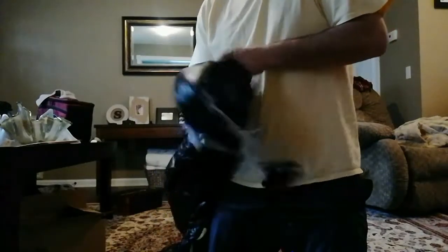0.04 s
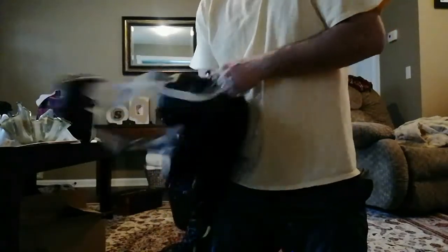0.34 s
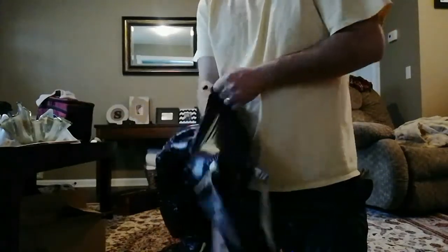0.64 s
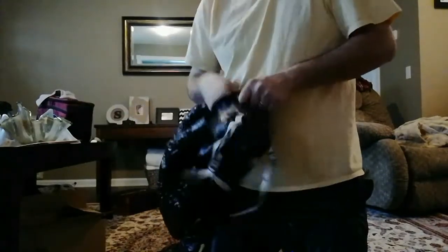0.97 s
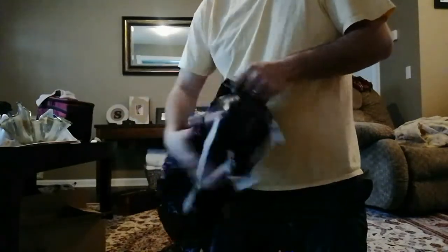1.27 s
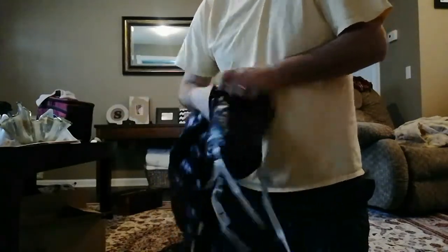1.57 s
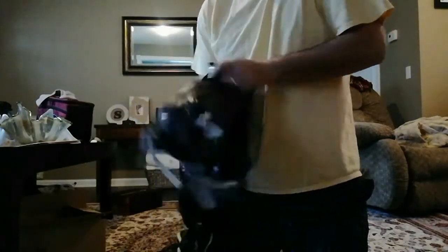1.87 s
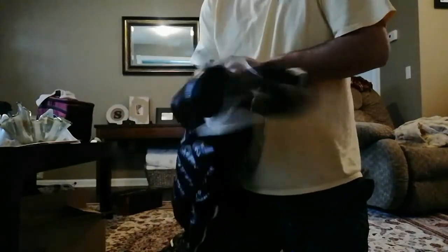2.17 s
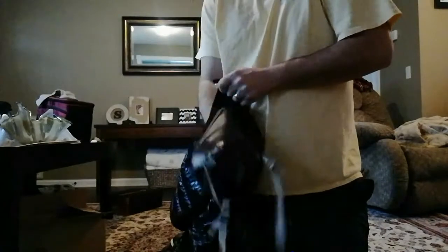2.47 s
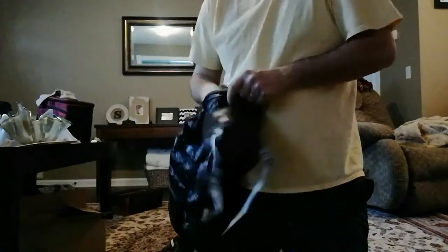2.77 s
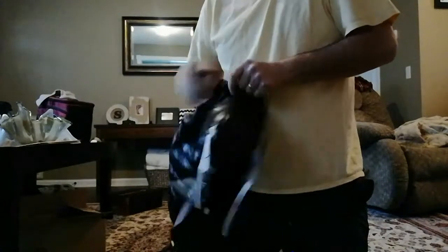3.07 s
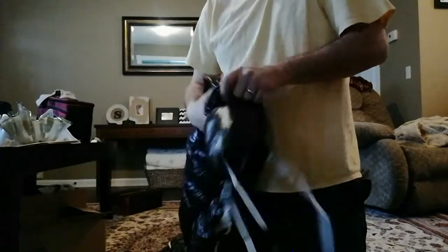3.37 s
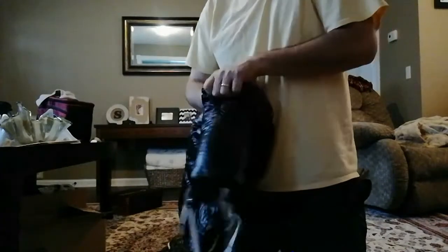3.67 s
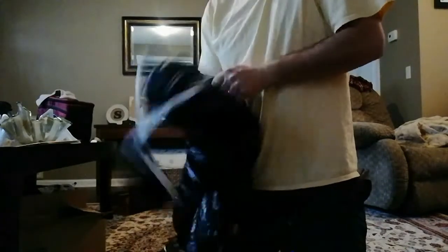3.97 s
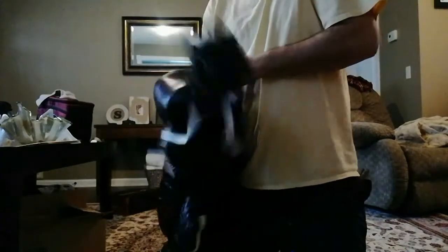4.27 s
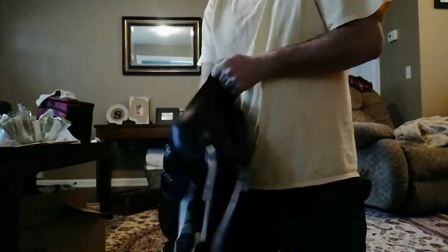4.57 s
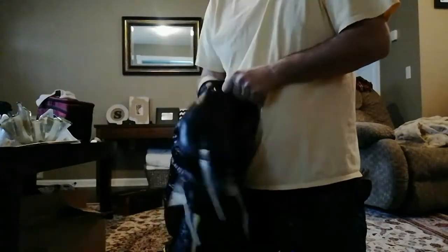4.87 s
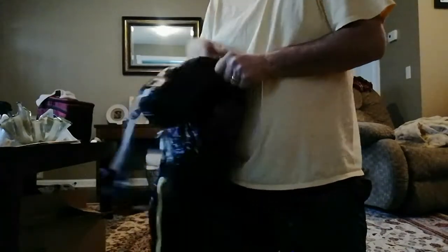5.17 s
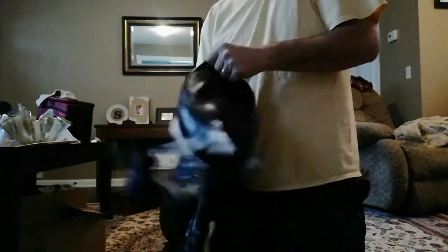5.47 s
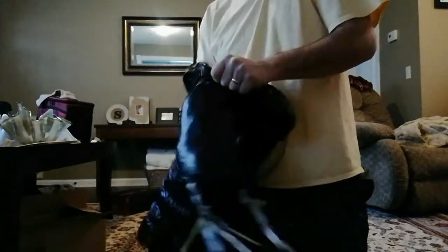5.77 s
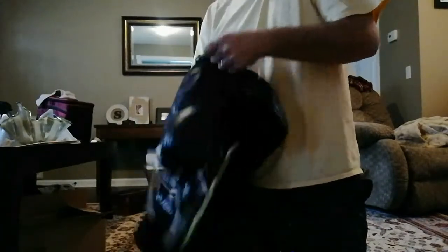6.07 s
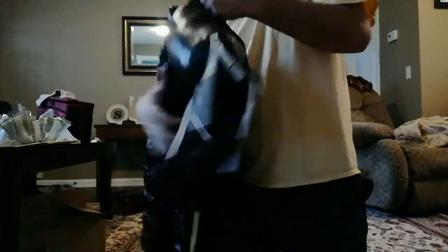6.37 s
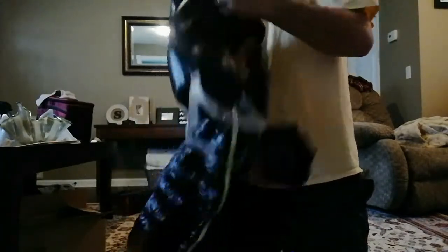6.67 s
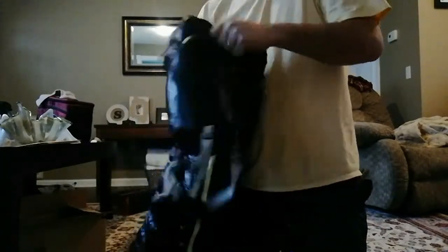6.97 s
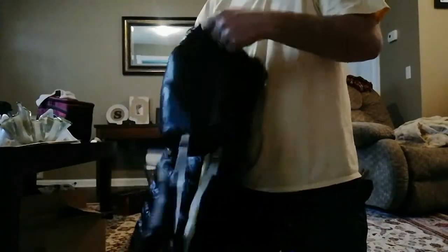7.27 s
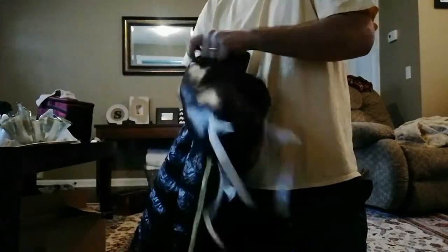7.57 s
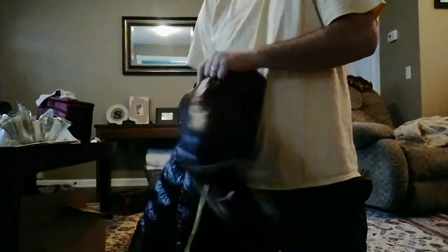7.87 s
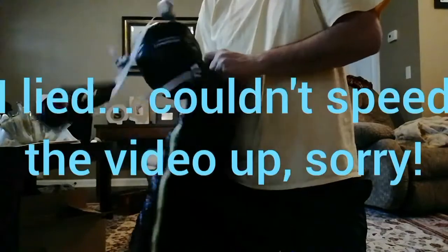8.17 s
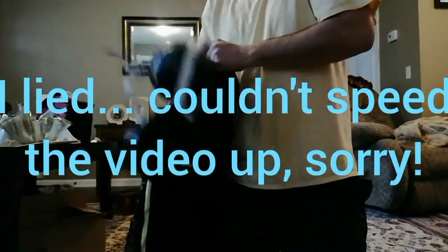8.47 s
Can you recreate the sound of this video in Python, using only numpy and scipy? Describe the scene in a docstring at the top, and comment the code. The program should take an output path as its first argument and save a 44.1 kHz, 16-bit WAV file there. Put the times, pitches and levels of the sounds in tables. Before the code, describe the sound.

Slippery nylon swishes and rustles in repeated, irregular shoves as someone stuffs a sleeping bag into a sack. Folds crumple, a hand scuffs the fabric, and the cloth snaps or flaps at intervals. After a vigorous start and a softer stretch in the second half, it ends with a flurry of snaps and louder rustling. The sound is close and fairly dry, in a quiet living room.

```python
"""Stuffing a sleeping bag

A nylon sleeping bag is crammed by hand into its stuff sack in a furnished living room, with a small
stereo recorder close by. Cloth slides on cloth with a swish, folds crumple, the filling billows,
the hand scuffs the nylon, the weave zips, and the sack snaps whenever it is jerked taut."""
import sys
import numpy as np
from scipy import signal
from scipy.fft import rfft, irfft, next_fast_len
from scipy.io import wavfile

SR = 44100
rng = np.random.default_rng(int(sys.argv[2]) if len(sys.argv) > 2 else 0)


def generate_wav(sig):
    """Save sig (samples, or channels by samples) to the path in sys.argv[1] as 16-bit PCM at SR."""
    pcm = np.round(np.clip(np.atleast_2d(sig).T, -1, 1) * 32767).astype(np.int16)
    wavfile.write(sys.argv[1], SR, pcm)


N = 375732


def from_db(db):
    return 10 ** (np.asarray(db) / 20)


def rms_one(x):
    return x / np.sqrt(np.mean(x ** 2) + 1e-20)


def at_hz(points, hz):
    """The columns of a table, read on a log-frequency axis."""
    known, *columns = np.transpose(points)
    return np.squeeze([np.interp(np.log(hz + 1e-9), np.log(known), c) for c in columns])


def butter(x, hz, kind, order=2):
    return signal.sosfilt(signal.butter(order, np.clip(hz, 10, .45 * SR), kind, fs=SR, output="sos"), x)


def split(x, hz):
    """The parts below and above a pitch; they add up to the whole."""
    low = signal.sosfiltfilt(signal.butter(3, hz, fs=SR, output="sos"), x)
    return low, x - low


def resonate(x, modes):
    """Each mode lifts or hollows a band of its own."""
    for hz, width_hz, gain_db in modes:
        x = x + (from_db(gain_db) - 1) * signal.lfilter(*signal.iirpeak(hz, hz / width_hz, fs=SR), x)
    return x


def drift(rate_hz):
    """A slow random wander of rms 1."""
    pole = np.exp(-80 * np.pi * rate_hz / SR)
    noise = rng.standard_normal(N // 40 + 2002)
    slow = signal.lfilter([1], [1, -2 * pole, pole * pole], noise)[2000:]
    return np.interp(np.arange(N) / 40, np.arange(len(slow)), rms_one(slow))


def add(track, start_s, sound):
    at = int(np.clip(round(start_s * SR), 0, N - 1))
    track[..., at:at + sound.shape[-1]] += sound[..., :N - at]


# How alike the two microphones hear the room: pitch_hz, correlation
MIC_LIKENESS = [(40, 0.91), (150, 0.89), (280, 0.79), (500, 0), (1000, 0.26), (1500, 0.92), (2200, 0.18),
                (4000, 0.09), (8000, 0), (15000, 0)]

def stereo(pair, hz):
    """Two unrelated signals become left and right, as alike as the microphones are at this pitch."""
    alike = np.clip(at_hz(MIC_LIKENESS, hz), -.995, .995)
    mid, side = np.sqrt(1 + alike) * pair[0], np.sqrt(1 - alike) * pair[1]
    return np.array([mid + side, mid - side]) / np.sqrt(2)


def coloured(pair, spectrum):
    """White excitation takes on a spectrum that falls away beyond its ends; stereo, rms 1."""
    size = next_fast_len(N)
    hz = np.fft.rfftfreq(size, 1 / SR) + 1e-3
    ends = 1 / np.sqrt((1 + (.8 * spectrum[0][0] / hz) ** 8) * (1 + (.8 * hz / spectrum[-1][0]) ** 8))
    shaped = stereo(rfft(pair, size), hz) * ends * from_db(at_hz(spectrum, hz))
    return rms_one(irfft(shaped)[:, :N])


# The living room with nothing moving: pitch_hz, level_db
QUIET_SPECTRUM = [(20, -1.5), (45, 8), (60, 2.5), (90, -0.5), (170, -6), (300, -16), (600, -29),
                  (1200, -15.5), (2500, -49), (5000, -45), (10000, -21), (16000, -25)]

def room_tone(level_db=-72.5):
    """The quiet of the house: a faint, steady rumble."""
    return from_db(level_db) * coloured(rng.standard_normal((2, N)), QUIET_SPECTRUM)


# Each shove, tug or regrip, close to the microphones: peak_s, rise_s, fall_s, swish_db,
# taut_db (upper over lower swish), sheen_db (top treble over swish), crumple_db,
# depth_db (low rub over crumple), pan_db (left over right)
HAND_STROKES = [(0.071, 0.13, 0.15, -40.5, 1.5, 1, -41.5, -8, -1.5),
                (0.204, 0.17, 0.22, -49.5, -5, -1.5, -51.5, 3, -5),
                (0.335, 0.1, 0.18, -36.5, 7, 1.5, -37, -5, -2),
                (0.488, 0.45, 0.2, -46, -2.5, -8, -45, -25, -0.5),
                (0.823, 0.33, 0.35, -54, 7.5, 9, -61.5, 1.5, -2.5),
                (0.919, 0.06, 0.6, -60, 2, -3, -64.0, 1, 3),
                (1.327, 0.12, 0.55, -54.0, 0, -2, -59, -2, 0.5),
                (1.514, 0.15, 1, -53, -2, -2, -56.0, -1.5, -2),
                (1.664, 0.14, 0.27, -44.5, -1, -0.5, -48.0, -7, 0.5),
                (1.926, 0.15, 0.15, -37.5, 2.5, 0, -43.5, -4.0, -0.5),
                (2.053, 0.12, 0.71, -43.5, 3, -7, -47.5, -2, 1),
                (2.224, 0.34, 0.17, -36.5, -2.5, 3, -39, -9.5, -0.5),
                (2.331, 0.41, 0.2, -40, -1.5, -1, -42.5, -36, -0.5),
                (2.667, 0.19, 0.1, -46, 1, 1.5, -54.0, -8, -4.5),
                (2.812, 0.082, 0.2, -48.0, -2, 3, -48.5, -14, -4),
                (2.953, 0.21, 0.34, -57, 6.5, 2.5, -66, 8, -1.5),
                (3.236, 0.11, 0.42, -54, -2, -2, -58, 0, 3.5),
                (3.409, 0.082, 0.5, -55, -4, -2.5, -61, 7, 0.5),
                (3.559, 0.048, 0.33, -51, -3, -2, -44.5, -9.5, 1.5),
                (3.78, 0.11, 0.41, -49.5, 0.5, -6, -56, 3.5, 2),
                (3.942, 0.12, 0.24, -41, 3, 2, -50, -4.5, 0.5),
                (4.177, 0.25, 0.26, -45, 4, 2, -46.5, -5, -1),
                (4.311, 0.16, 0.15, -37.5, -7.5, -0.5, -49, -1.5, -0.5),
                (4.427, 0.22, 0.17, -40, -3.0, -1.5, -44, -13, -1.0),
                (4.665, 0.2, 0.5, -52.5, 3.5, 0, -63, -2, -4),
                (5.034, 0.38, 0.47, -61.5, 0.5, 5.5, -63, -4.5, 3),
                (5.188, 0.2, 0.5, -61.5, 4.5, 2, -70, 3, 0),
                (5.516, 0.098, 0.15, -52, -2.5, -6, -48.5, -1, 5),
                (5.706, 0.39, 0.2, -57.5, 0, 5.5, -55, -2.5, 0.5),
                (5.866, 0.18, 0.13, -52.5, 0.0, -6, -51, -2.5, 1), (6.011, 0.4, 1, -63, 0, 4, -66, -0.5, 1),
                (6.457, 0.073, 0.092, -48, -6.5, -5.5, -54.0, -5, 0.0),
                (6.545, 0.086, 0.33, -51, -0.5, -1, -54, -3.5, -2.0),
                (6.756, 0.23, 0.26, -49.5, -1.0, -0.5, -53, -4.5, -2),
                (7.055, 0.075, 0.22, -50.5, -7.5, -5, -53.5, -3, -1.5),
                (7.266, 0.26, 0.29, -53.5, -7, -6, -50.0, -5.5, -2.0),
                (7.378, 0.25, 0.18, -46.5, 1.0, 2, -53.5, -5.5, -1),
                (7.729, 0.43, 0.11, -54.5, -2.0, -4.5, -60, -2.5, -5.5),
                (7.954, 0.3, 0.16, -46.5, -5, -7, -47.5, -4.5, -2.5),
                (8.072, 0.29, 0.87, -53.5, 4.5, -4.5, -59.0, 1, -6.5),
                (8.258, 0.093, 0.13, -43.5, -11.5, -13, -39, -2.5, -7.5),
                (8.365, 0.16, 0.3, -38.5, -3, 1.5, -41, -7.5, -1),
                (8.509, 0.29, 0.2, -45.5, 1, -1.0, -43.5, -17, 1)]

def strokes(peaks_db, drop_db=21, roundness=1.29):
    """Each stroke swells and fades, drop_db down at the ends of rise and fall; overlaps add in power."""
    t = np.arange(0, N, 32) / SR
    power = 1e-14
    for (peak_s, rise_s, fall_s, *_), peak_db in zip(HAND_STROKES, peaks_db):
        away = np.maximum((peak_s - t) / rise_s, (t - peak_s) / fall_s)
        power = power + from_db(peak_db - drop_db * away ** roundness) ** 2
    return np.interp(np.arange(N) / SR, t, np.sqrt(power))


def friction(per_s, spread_db, grain_share, clump_db):
    """Countless tiny slips merge into noise; larger buckles of the cloth stand out in clumps; rms 1."""
    buckling = rng.random((2, N)) < per_s * from_db(clump_db * drift(14)) / SR
    sizes = from_db(spread_db * np.minimum(rng.exponential(1, (2, N)), 4))
    grains = rms_one(buckling * sizes * rng.choice([-1, 1], (2, N)))
    return np.sqrt(grain_share) * grains + np.sqrt(1 - grain_share) * rng.standard_normal((2, N))


def shifting_folds(x, depth_db, fold_q):
    """Pockets open and close in the cloth, so that single bands swell and fade; rms 1."""
    for hz in np.geomspace(900, 6500, 9):
        band = signal.lfilter(*signal.iirpeak(hz, fold_q, fs=SR), x)
        x = x + (from_db(depth_db * drift(4.5)) - 1) * band
    return rms_one(x)


# Nylon sliding on nylon, heard close: pitch_hz, level_db
SWISH_SPECTRUM = [(1500, 0), (2200, 3.5), (2900, 3.5), (4000, 5), (5400, 4.5), (7000, 0.5), (9000, -3.5),
                  (12000, -8.5), (15500, -7.5)]

def swish(trim_db=0.12, sheen_share=0.92, air_db=0.5):
    """Weave rubs on weave: tension tips it upward; each stroke has its own amount of airy hiss on top."""
    _, _, _, level_db, taut_db, sheen_db, _, _, pan_db = np.transpose(HAND_STROKES)
    slips = friction(per_s=900, spread_db=6.5, grain_share=0.083, clump_db=4.0)
    rub = shifting_folds(coloured(slips, SWISH_SPECTRUM), depth_db=2.5, fold_q=12)
    body, top = split(rub, hz=6950)
    slack, tight = split(body, hz=3880)
    sheen, air = split(top * from_db(.5 * drift(60)), hz=10000)
    weave = 0
    for band, colour_db in [(slack, -taut_db / 2), (tight, taut_db / 2),
                            (sheen, sheen_share * sheen_db), (air, sheen_db + air_db)]:
        swell = np.array([strokes(level_db + colour_db + side * pan_db / 2) for side in (1, -1)])
        weave = weave + band * swell
    return from_db(trim_db + 0.9 * drift(24)) * weave


# Buckling folds, heard close: pitch_hz, level_db
FOLD_SPECTRUM = [(220, -3), (310, -3), (400, 0), (560, 0.5), (740, -4.5), (950, 1), (1200, -2.5),
                 (1600, -1.5), (2100, -7.5), (3000, -18.5)]

def crumple(trim_db=-0.1):
    """Folds buckle and rub; slack, thick folds sound deeper."""
    *_, level_db, depth_db, _ = np.transpose(HAND_STROKES)
    buckles = friction(per_s=450, spread_db=3.0, grain_share=0.41, clump_db=4.5)
    rub = shifting_folds(coloured(buckles, FOLD_SPECTRUM), depth_db=3.0, fold_q=7.5)
    low, body = split(rub, hz=843)
    folds = body * strokes(level_db) + low * strokes(level_db + depth_db)
    return from_db(trim_db + 0.4 * drift(50)) * folds


# Air puffing out of the filling: pitch_hz, level_db
FILLING_SPECTRUM = [(25, -22), (50, -2), (100, 0.5), (170, -4), (240, -7.5), (330, -14.5), (500, -0.5)]

def billow(puff_db=-62, at_rub_db=-53, growth=1.54):
    """Loose panels flap and push out soft puffs of air, the more the harder the thick folds rub."""
    *_, crumple_db, depth_db, _ = np.transpose(HAND_STROKES)
    puffs = friction(per_s=140, spread_db=5.0, grain_share=0.53, clump_db=1)
    swell = strokes(puff_db + growth * (crumple_db + depth_db - at_rub_db))
    return swell * from_db(1.5 * drift(9.7)) * coloured(puffs, FILLING_SPECTRUM)


# Grips that set the cloth rubbing all at once: start_s, level_db, fade_s, pitch_hz
HAND_SCUFFS = [(.06, -50, .02, 80), (.062, -43, 0.013, 1490), (.281, -37.5, 0.038, 1000),
               (0.356, -50, 0.019, 248), (2.142, -42, 0.028, 160), (2.784, -54, 0.026, 225.3),
               (3.188, -49.5, .014, 1090), (5.384, -55.5, 0.017, 400), (5.466, -44.5, 0.015, 870),
               (6.395, -53, .012, 2580), (7.028, -44, 0.015, 2550), (7.367, -49, .018, 170),
               (7.832, -44, 0.0065, 2940)]

def scuffs(grab_s=0.001):
    """The hand catches the nylon and lets it slip; a deep shove stirs the filling too."""
    out, t = np.zeros((2, N)), np.arange(SR // 5) / SR
    for start_s, level_db, fade_s, hz in HAND_SCUFFS:
        noise = rms_one(butter(rng.standard_normal((2, SR)), [hz / 2, hz * 2], "band"))[:, -len(t):]
        envelope = (1 - np.exp(-t / grab_s)) * np.exp(-t / fade_s)
        add(out, start_s, from_db(level_db) * stereo(noise, hz) * envelope)
    return out


# The brief ring of the taut sack: pitch_hz, width_hz, gain_db
PANEL_MODES = [(920, 210, 5.5), (1430, 160, 4), (2250, 2800, -1), (3800, 330, 6)]
# The cloth jerks taut, heard direct: start_s, peak_db, sharpness_hz, lowest_hz, pan_db (left over right)
TAUT_SNAPS = [(0.312, -24, 900, 110, 2), (0.3431, -23.5, 800, 110, 4), (0.3535, -20.5, 260, 171, 1),
              (0.3555, -11.5, 1540, 221, 2), (1.9321, -21, 4060, 250, 5), (1.9352, -31, 3000, 400, 0),
              (2.0749, -37, 1500, 200, 0), (2.1421, -17.5, 191, 80.5, 2), (2.142, -15, 960, 280, 2.5),
              (3.0513, -62, 2000, 500, 1), (3.0529, -27, 1900, 446, -2.5), (3.0549, -44, 2000, 900, -2),
              (3.194, -39, 1000, 150, 3), (3.4011, -27.5, 840, 140, 3.5), (3.5555, -12, 4500, 200, 0),
              (3.7738, -26, 1240, 130, 2.5), (3.8650, -29, 1100, 110, 0), (4.2937, -28.5, 475, 69.6, 1),
              (5.4693, -35.5, 1080, 120, 3), (6.5286, -40, 1300, 120, -5), (7.0836, -33.5, 3770, 800, -1),
              (7.0934, -34, 3800, 800, -2), (7.2308, -22, 2300, 300, -1), (7.2470, -31.5, 700, 99, 4),
              (7.3649, -30.5, 228, 100, 3), (7.8327, -35, 4000, 700, 0), (8.2103, -22.5, 1180, 300, 7.5),
              (8.2187, -29, 1500, 250, -8), (8.2308, -22, 1300, 250, 10), (8.247, -17, 1400, 230, 3),
              (8.2580, -18.5, 1280, 216, 8), (8.3176, -15, 760, 282, 6), (8.3307, -17, 790, 272, 3)]

def snaps(flaps, muffle_hz=4600, crack_db=-15):
    """Each jerk or flap of a panel is one pressure pulse: narrow from a small fold, a thud if wide."""
    out, t = np.zeros((2, N)), np.arange(SR // 16) / SR
    for start_s, peak_db, sharpness_hz, lowest_hz, pan_db in list(TAUT_SNAPS) + flaps:
        age = 2 * np.pi * sharpness_hz * t
        pulse = butter(age * np.exp(-age), lowest_hz, "high")
        # the filling muffles all but a thin crack
        muffled = butter(pulse, muffle_hz, "low", order=3) + from_db(crack_db) * pulse
        snap = resonate(muffled, PANEL_MODES)
        gains = from_db(peak_db + pan_db * np.array([[.5], [-.5]]))
        add(out, start_s, -snap / np.abs(snap).max() * gains)
    return out


# The weave zipping: start_s, length_s, first_hz, last_hz, uneven_hz, level_db (before lift_db)
WEAVE_ZIPS = [(0.462, .1, 1480, 1046, 160, -52.5), (0.756, 0.1, 3620, 3790, 200, -64.5),
              (1.273, 0.18, 828, 718, 149, -64), (2.285, 0.21, 1248, 712, 223, -61.5),
              (2.609, 0.083, 3660, 4120, 485, -54.5), (3.169, 0.14, 870, 757, 220, -60),
              (3.4, 0.2, 384, 704, 120, -61.5), (4.7, 0.48, 14700, 14600, 1800, -64.5),
              (5.6, 0.22, 7400, 8300, 1000, -71)]

def zips(lift_db=7):
    """Thread drags over thread: a narrow band of noise glides with the rate at which they cross."""
    out = np.zeros((2, N))
    for start_s, length_s, first_hz, last_hz, uneven_hz, level_db in WEAVE_ZIPS:
        hz = np.geomspace(first_hz, last_hz, int(length_s * SR))
        unevenness = rms_one(butter(rng.standard_normal((2, SR)), uneven_hz, "low")[:, -len(hz):])
        tone = unevenness * np.sin(2 * np.pi * np.cumsum(hz) / SR)
        arch = np.sin(np.linspace(0, np.pi, len(hz)))
        add(out, start_s, from_db(level_db + lift_db) * stereo(tone, first_hz) * arch)
    return out


# A loose panel, a little to the left: start_s, length_s, peak_db, sharpness_hz, lowest_hz
PANEL_FLUTTERS = [(1.874, .07, -34, 600, 121), (2.16, .08, -41, 250, 80), (4.12, .16, -32.5, 600, 71),
                  (5.444, .06, -42, 400, 90), (6.536, .07, -46, 350, 80), (8.179, .025, -33.5, 1000, 250)]

def flutters(gap_s=.018, spread_db=2.5, left_db=2):
    """A loose panel flutters in a run of small, uneven flaps; returns them as rows for snaps()."""
    flaps = []
    for start_s, length_s, peak_db, sharpness_hz, lowest_hz in PANEL_FLUTTERS:
        at_s = start_s
        for gap, strength, side in rng.standard_normal((16, 3)):
            if at_s < start_s + length_s:
                flap_db = peak_db + spread_db * strength
                flaps.append((at_s, flap_db, sharpness_hz, lowest_hz, left_db * (1 + side)))
            at_s += gap_s * np.exp(.3 * gap)
    return flaps


# Hard surfaces right beside the recorder: delay_ms, left_gain, right_gain
NEAR_SURFACES = [(.68, 0.22, 0.53), (1.92, 0.32, 0.41)]

def near_echoes(x):
    """Nearby surfaces repeat each pulse at once and make it sound hollow."""
    out = x.copy()
    for delay_ms, left, right in NEAR_SURFACES:
        add(out, delay_ms / 1000, x * [[left], [right]])
    return out


# The short ring of the furnished living room: pitch_hz, t60_s, ring_db
ROOM_DECAY = [(120, 0.25, -11.5), (300, 0.22, -4), (600, 0.26, -5.5), (1400, 0.22, -6.5), (3000, 0.25, -4),
              (8000, .22, -17)]

def room(x, build_s=0.002):
    """Reflections thicken over the first moments and die away octave by octave."""
    t, tail = np.arange(SR // 2) / SR, 0
    edges_hz = 60 * 2 ** np.arange(9)
    for low, high in zip(edges_hz, edges_hz[1:]):
        hz = np.sqrt(low * high)
        t60_s, ring_db = at_hz(ROOM_DECAY, hz)
        decay = (1 - np.exp(-t / build_s)) * np.exp(-np.log(1000) * t / t60_s)
        noise = butter(rng.standard_normal((2, len(t))), [low, high], "band")
        tail = tail + from_db(ring_db) * stereo(noise, hz) * decay / np.linalg.norm(decay)
    return signal.fftconvolve(x, tail, axes=1)[:, :N]


# Standing waves between body, sack and furniture: pitch_hz, width_hz, gain_db
STANDING_WAVES = [(175, 48, 4), (271.5, 6.9, 7), (381, 17, 4), (508, 9.6, 4), (600, 19, 4.5), (714, 54, 2),
                  (794, 6.5, 4), (894, 8.5, -2.5), (1147, 22, 3.5), (1337, 8.5, 3.5), (1580, 45, -0.5),
                  (2950, 300, -0.5), (3720, 340, 1)]

def scene():
    """The bag close by, the room's answer to its snaps, and the quiet of the house behind."""
    taut = near_echoes(snaps(flutters()))
    rustle = swish() + crumple() + billow() + zips() + scuffs()
    quiet = room_tone()
    reflections = from_db(-1.0) * room(taut)
    return taut + resonate(reflections + rustle, STANDING_WAVES) + quiet


# The colour of the left microphone against the right: pitch_hz, balance_db
MIC_BALANCE = [(100, 0), (350, -2), (580, 2), (850, 0.5), (1150, -0.5), (1800, -2), (2600, -0.5),
               (3800, 0.5), (5300, 1), (7200, -9.5), (9500, -8), (12500, -5), (15000, -9.5)]

def record(dry, lag_ms=0.032, cutoff_hz=15850):
    """Each microphone adds its own colour, the right one hears a little later; the top is cut."""
    size = next_fast_len(N + SR // 10)
    hz = np.fft.rfftfreq(size, 1 / SR)
    colour = from_db(at_hz(MIC_BALANCE, hz) * np.array([[.5], [-.5]]))
    colour = colour / np.sqrt(np.mean(colour ** 2, axis=0))
    lag = np.exp(-2j * np.pi * hz * np.array([[0], [lag_ms / 1000]]))
    low_pass = 1 / np.sqrt(1 + (hz / cutoff_hz) ** 300)
    return irfft(rfft(dry, size) * colour * lag * low_pass, size)[:, :N]


dry = scene()
out = record(dry)
generate_wav(out)
```